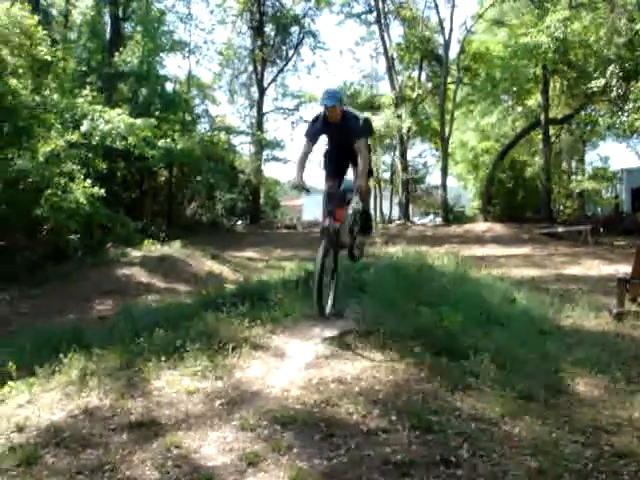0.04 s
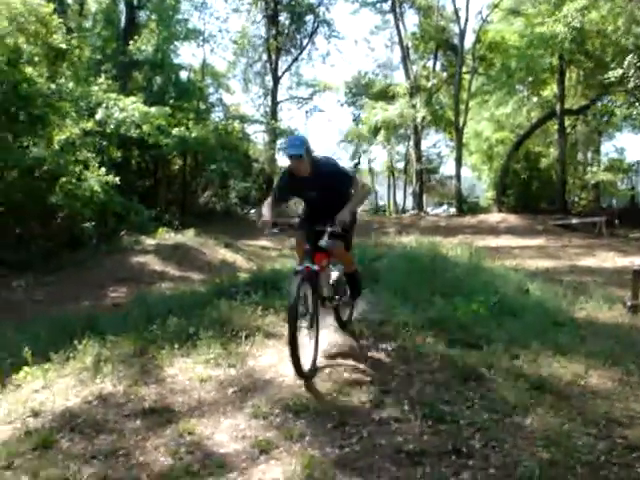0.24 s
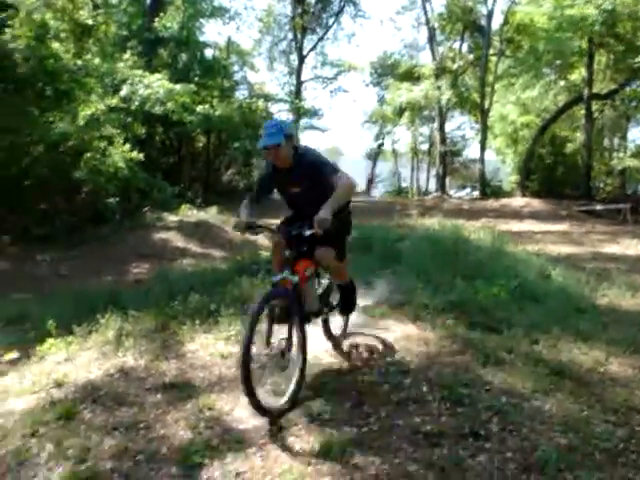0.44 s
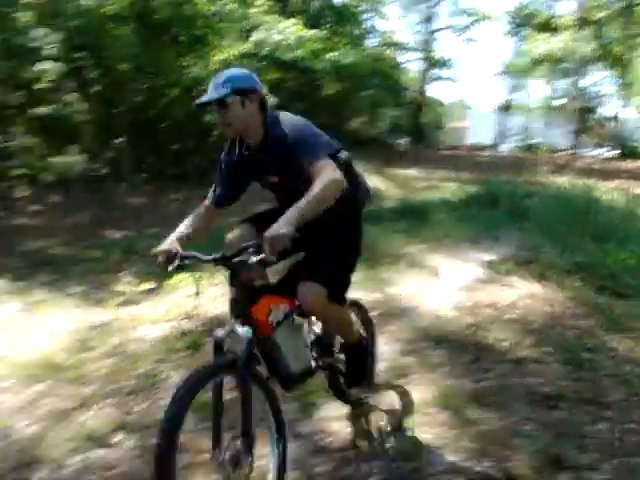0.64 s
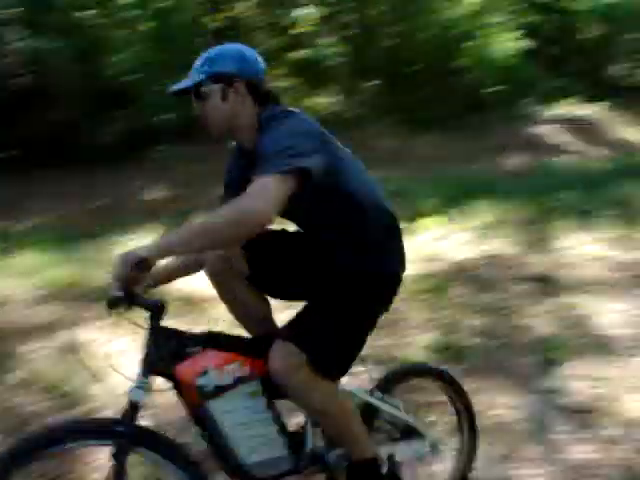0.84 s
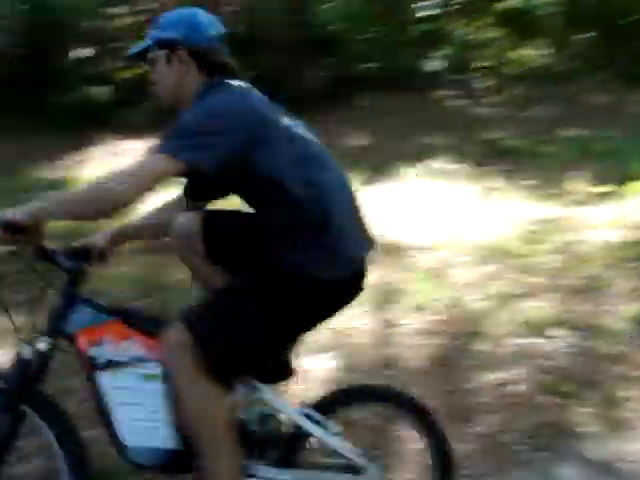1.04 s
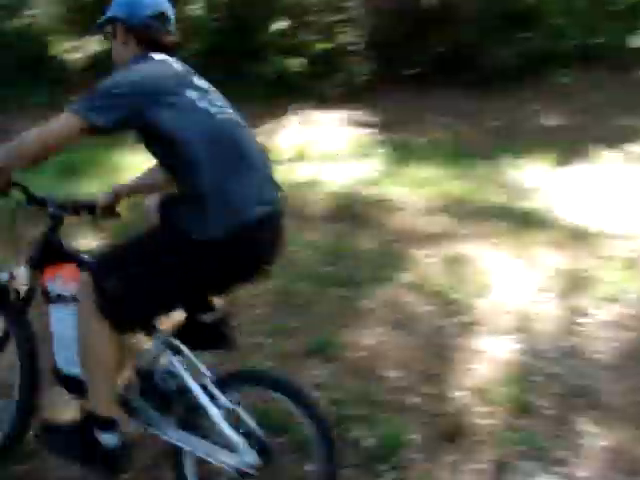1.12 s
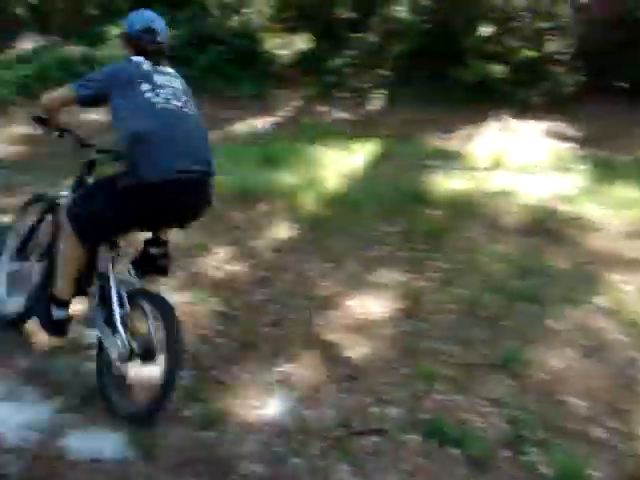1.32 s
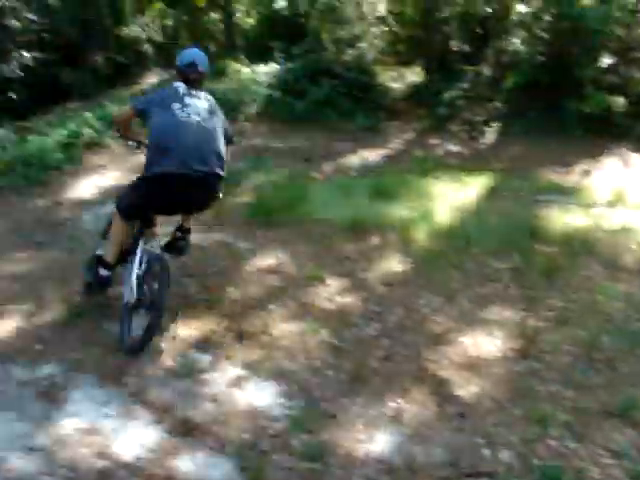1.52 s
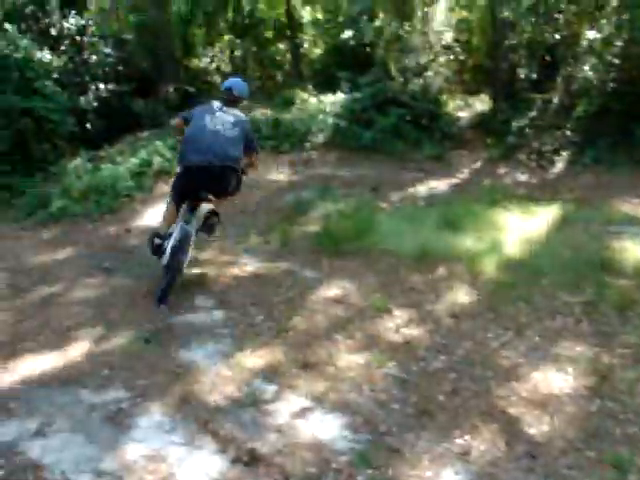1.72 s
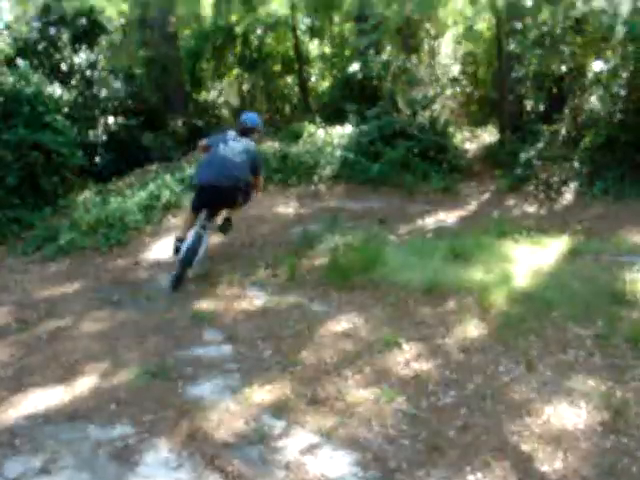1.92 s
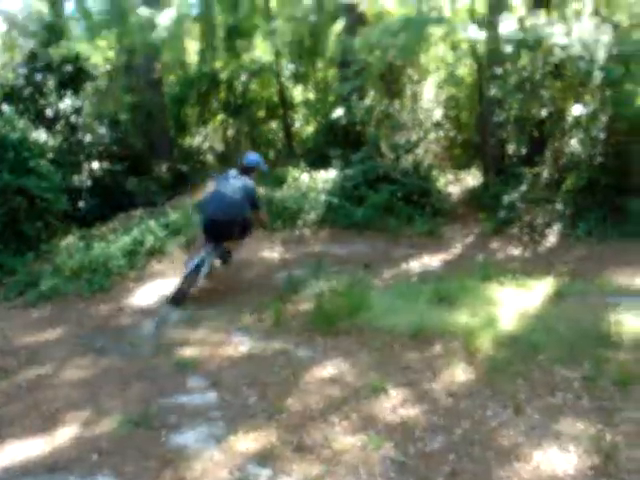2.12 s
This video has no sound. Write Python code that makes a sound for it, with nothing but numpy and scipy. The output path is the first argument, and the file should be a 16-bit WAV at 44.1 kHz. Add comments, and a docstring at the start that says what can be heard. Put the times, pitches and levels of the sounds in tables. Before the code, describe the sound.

In quiet woodland, a bike slams down from a jump near the microphone, its metal ringing and its brake squeaking briefly. The tyres crunch over leaves and grit with hollow rattling knocks, then fade. A bird chirps softly.

```python
"""Mountain bike landing on a woodland trail

Close by, a bike lands from a jump, front wheel then rear, and rolls past over dry leaves and dirt.
Bursts of contacts excite ringing metal and a hollow box on the frame; filtered grains make the tyres crunch.
Narrow noise squeaks at the brake disc. A bird repeats its phrase of gliding tones in the trees, over a soft
noise bed, while the bike fades away. The microphone overloads on the landing and has no top octave."""
import sys
import numpy as np
from scipy import signal
from scipy.fft import rfft, irfft
from scipy.io import wavfile

SR = 44100
rng = np.random.default_rng(int(sys.argv[2]) if len(sys.argv) > 2 else 0)


def persist_wave(psi):
    """Save psi, clipped to +-1, as 16-bit WAV."""
    counts = np.round(np.clip(psi, -1, 1) * 32767).astype(np.int16)
    wavfile.write(sys.argv[1], SR, np.atleast_2d(counts).T)


N = 94815
TIME_S = np.arange(N) / SR

# rear wheel landing, blows and their after-rattle: start_s, length_s, level_db
LANDING_BLOWS = [(0.2971, 0.005, -3), (0.3098, 0.0065, -7), (0.324, 0.0079, -9.5), (0.337, 0.0016, -23.5),
                 (0.365, 0.014, -26.5)]
LAND_RELEASE_S = 0.0044
LAND_RING_DB, LAND_BODY_DB, LAND_SPRAY_DB = 18, -10, -11.5
# one-sided lurch of the overloaded microphone
LURCH_START_S, LURCH_LENGTH_S, LURCH_DB = 0.298, 0.039, -18

# knocks over bumps: start_s, length_s, box_level_db, clack_level_db
BUMP_KNOCKS = [(0.22, 0.0089, -23, -28), (.229, 0.018, -24.5, -23.5), (0.282, 0.015, -30, -23.5),
               (0.412, 0.017, -26.5, -30.5), (0.462, 0.015, -23.5, -29.5), (0.5, 0.013, -24.5, -28),
               (0.639, 0.03, -35.5, -30.5), (0.689, 0.0058, -31, -17.5), (.699, 0.0072, -18.5, -19),
               (0.723, 0.013, -32, -28), (0.7881, .007, -15.5, -19), (0.798, 0.0048, -17, -27),
               (0.812, 0.021, -26.5, -27), (0.856, 0.0068, -23.5, -24.5), (0.882, 0.0067, -21.5, -26),
               (0.89, 0.0057, -22.5, -22.5), (0.923, 0.018, -27, -36), (0.976, 0.0044, -25.5, -37),
               (1.033, .008, -31, -25), (1.087, 0.019, -25.5, -28), (1.119, 0.0066, -19.5, -27.5),
               (1.161, 0.0069, -24, -27.5), (1.174, 0.013, -25, -27), (1.2028, 0.0088, -12.5, -19),
               (1.2132, 0.0034, -19.5, -27), (1.2675, 0.0032, -19, -20), (1.2743, 0.0035, -13.5, -26),
               (1.309, 0.012, -26, -29), (1.337, 0.015, -24, -26), (1.4972, 0.011, -28.5, -28.5),
               (1.642, 0.0055, -30, -33), (1.701, 0.0034, -48, -38.5), (1.756, 0.0019, -51, -33.5),
               (1.846, 0.0036, -30.5, -33), (1.87, 0.0085, -26, -30.5), (1.892, .008, -33, -34.5),
               (2.13, 0.017, -34.5, -45)]
KNOCK_RATE_HZ, KNOCK_RING_DB = 900, -13.5
BOX_RELEASE_S, CLACK_RELEASE_S = 0.00324, 0.0018
BOX_LOW_HZ, CLACK_LOW_HZ = 173, 270
# hollow box resonances: pitch_hz, width_hz, level_db
BOX_MODES = [(238, 200, -24.5), (327, 72, -2), (455, 133, 2.5), (529, 78, -1.5), (787, 350, -8.5),
             (1211, 97, -8)]
# ringing metal of frame and wheels: pitch_hz, t60_s, level_db
FRAME_MODES = [(320.4, 0.11, 0.5), (476, 0.087, 2), (871, 0.27, -6.5), (964, 0.32, -8.5),
               (1061.5, 0.25, -3.5), (1836, 0.45, -0.5), (2060, 0.053, 2), (2050, 0.22, -8),
               (2630, 0.18, -21), (2750, 0.2, -7), (3050, 0.18, -4.5), (3360, .12, -7), (3770, .18, -24),
               (4430, .14, -12)]
# outline of hard contacts on the frame: frequency_hz, level_db
CLACK_COLOUR = [(150, -22.5), (400, -0.5), (750, 4.5), (1200, -2.5), (1550, -6.5), (2000, -1.5), (2800, -2),
                (3700, -5), (4400, -5.5), (6000, -12), (8500, -15), (10000, -22)]

# rolling tyres over time: time_s, rumble_db, crunch_db, crackle_db
TYRE_LEVELS = [(0, -45.5, -44.5, -51), (.2, -43, -41.5, -52), (0.271, -28.5, -32, -40),
               (0.343, -30.5, -22.5, -26.5), (0.421, -29.5, -25.5, -34.5), (.52, -39, -31, -35),
               (.6, -36.5, -34, -42), (0.699, -31, -32, -57), (.86, -32.5, -31, -36),
               (.97, -31.5, -30, -36.5), (1.099, -33.5, -28.5, -35.5), (1.22, -30, -29.5, -33.5),
               (1.35, -35.5, -29.5, -35.5), (1.46, -31.5, -36, -39.5), (1.54, -40, -33.5, -44),
               (1.58, -39, -38.5, -40.5), (1.8, -39, -39.5, -50.5), (1.96, -38, -43, -46.5),
               (2.06, -38.5, -40, -49), (2.15, -37.5, -35.5, -46.5)]
# outline of tyre rumble and the low body of the landing: frequency_hz, level_db
RUMBLE_COLOUR = [(25, -24), (60, -12), (130, -11.5), (220, -0.5), (330, -0.5), (480, 1.5), (700, -6.5),
                 (1100, -11), (1800, -30), (5000, -59.5)]
# outline of crunching grit: frequency_hz, level_db
CRUNCH_COLOUR = [(300, -18.5), (700, -0.5), (1150, 1.5), (1550, -1.5), (2000, -2), (2900, 0.5),
                 (3800, -7.5), (4800, -11.5), (6500, -7), (10000, -31)]
# outline of dry leaves and twigs: frequency_hz, level_db
LEAF_COLOUR = [(1000, -9.5), (3000, -15), (4700, 3), (6200, -1.5), (7600, 2), (8600, 3.5), (9300, 0.5),
               (10000, -4)]
GRAIN_FLICKER_DB = 1

# leaves and twigs snapping: start_s, length_s, level_db
LEAF_SNAPS = [(0.215, 0.0081, -28), (0.225, .01, -30), (0.617, 0.011, -27), (0.751, 0.011, -33),
              (0.827, 0.015, -27), (1.124, 0.0026, -24.5), (1.253, 0.0035, -31), (1.593, 0.0019, -41),
              (1.7, 0.0041, -32), (1.75, 0.0019, -32.5), (1.774, 0.0024, -30), (1.803, 0.0077, -35),
              (1.85, 0.0096, -26.5), (1.881, 0.0045, -31), (1.996, 0.0052, -38)]
SNAP_RELEASE_S = 0.002

# sideways tyre scuffs in the turn: middle_s, half_length_s, level_db
TURN_SCUFFS = [(1.345, 0.059, -32), (1.427, 0.043, -38.5), (1.55, 0.021, -46), (2.124, 0.055, -42.5)]
# scuff resonances: pitch_hz, width_hz, level_db
SCUFF_MODES = [(1980, 320, -2), (2520, 250, -0.5), (3050, 420, -2)]

# brake disc squeaks: start_s, length_s, level_db
BRAKE_SQUEAKS = [(.03, .05, -55), (0.157, 0.056, -43), (.372, 0.028, -22.5), (0.4, 0.064, -38)]
SQUEAK_HZ, SQUEAK_FILTER_WIDTH_HZ = 8760, 260

# bird phrase starts: start_s, level_db
BIRD_PHRASES = [(0, -36), (0.536, -32.5), (.805, -34)]
# notes within a phrase: start_s, length_s, start_hz, end_hz, level_db
BIRD_NOTES = [(0, 0.014, 3560, 3400, 0), (0, 0.046, 2897, 2980, 1.5), (0.051, 0.048, 4220, 4200, -2),
              (0.09, 0.027, 4345, 4970, 4.5), (.1, 0.057, 4400, 4700, -6), (0.117, 0.051, 4970, 5000, -4),
              (0.145, 0.022, 2480, 2590, -1), (0.179, 0.033, 3620, 3430, 3.5)]
WARBLE_SHARE = 0.026  # spread of the pitch wander, as a share of the pitch

TREES_T60_S, TREES_BUILDUP_S = 0.45, 0.0088
BIRD_ECHO_DB, BIKE_ECHO_DB = -1.5, -19.5
# outline of the woodland background: frequency_hz, level_db
WOODS_COLOUR = [(25, -35), (60, 2.5), (150, -7.5), (310, 11), (700, -4), (1400, -8), (2800, -10),
                (4000, -27.5), (6500, -39), (10000, -17)]
WOODS_DB = -47

# microphone levels are on a scale where full scale is 1
OVERLOAD_LEVEL, CEILING = 0.69, 0.75
MIC_TOP_HZ, FINAL_TOP_HZ = 9850, 15400


def landing():
    """The rear wheel slams down: chain and frame clatter, the first blow rings the metal, leaves spray."""
    contacts = grains(rate=4500, spread_db=2)
    force = sum(undb(db) * burst(contacts, gate(start, length, LAND_RELEASE_S))
                for start, length, db in LANDING_BLOWS)
    clatter = colour(force, CLACK_COLOUR)
    body = undb(LAND_BODY_DB) * colour(force, RUMBLE_COLOUR)
    spray = undb(LAND_SPRAY_DB) * colour(force, LEAF_COLOUR)
    # only the first blow sets this ring going
    first_blow = signal.unit_impulse(N, int(LANDING_BLOWS[0][0] * SR))
    metal = undb(LAND_RING_DB) * frame(first_blow)
    return clatter + metal + body + spray


def overload_lurch():
    """The overloaded microphone's level lurches to one side and recovers."""
    offset = half_sine(LURCH_START_S, LURCH_LENGTH_S) ** 0.55
    return undb(LURCH_DB) * highpass(offset, 7, order=1)


def knocks():
    """Each bump is a brief rattle of contacts that booms in the box and clacks on the frame."""
    contacts = grains(rate=KNOCK_RATE_HZ, spread_db=2) + 1.31 * rng.standard_normal(N)
    boom = ring(contacts, BOX_MODES)
    hard = colour(contacts, CLACK_COLOUR)
    box, clack = np.zeros(N), np.zeros(N)
    for start, length, box_db, clack_db in BUMP_KNOCKS:
        box += undb(box_db) * burst(boom, gate(start, length, BOX_RELEASE_S))
        # the clack is hardest at first
        attack = 0.3 * gate(start, 0, release=0.0012)
        clack += undb(clack_db) * burst(hard, gate(start, length, CLACK_RELEASE_S) + attack)
    metal = undb(KNOCK_RING_DB) * frame(clack)
    return highpass(box, BOX_LOW_HZ) + highpass(clack, CLACK_LOW_HZ) + metal


def frame(x):
    """Metal of frame and wheels rings as damped modes, each with its own decay time."""
    # a mode's width follows from its 60 dB decay time
    return ring(x, [(hz, np.log(1000) / (np.pi * t60), db) for hz, t60, db in FRAME_MODES])


def tyres():
    """Knobs drum on the dirt, grit crunches and dry leaves crackle, in uneven patches."""
    time_s, *curves = np.array(TYRE_LEVELS).T
    patches_db = 1.05 * walk(60)
    rumble_gain, crunch_gain, crackle_gain = (
        undb(np.interp(TIME_S, time_s, curve) + patches_db) for curve in curves)
    drumming = colour(grains(rate=1800, spread_db=1.5), RUMBLE_COLOUR)
    grit = debris(rate=4500, spread_db=2.5, low_hz=610, high_hz=5210)
    crunch = unit(colour(grit, CRUNCH_COLOUR))
    crackle_flicker = undb(3.6 * walk(160))
    leaves = debris(rate=6000, spread_db=6, low_hz=2960, high_hz=9700, count=6)
    crackle = crackle_flicker * unit(colour(leaves, LEAF_COLOUR))
    return rumble_gain * drumming + crunch_gain * crunch + crackle_gain * crackle


def debris(rate, spread_db, low_hz, high_hz, count=9):
    """Grains crack in neighbouring pitch bands, each band flickering on its own; rms 1."""
    centres = np.linspace(low_hz, high_hz, count)
    width = centres[1] - centres[0]
    bands = (undb(GRAIN_FLICKER_DB * walk(110)) * ring(grains(rate / count, spread_db), [(hz, width, 0)])
             for hz in centres)
    return unit(sum(bands))


def snaps():
    """Single leaves and twigs break under the tread as short bursts of grains."""
    cracks = grains(rate=1500, spread_db=-1.5)
    breaks = sum(undb(db) * burst(cracks, gate(start, length, SNAP_RELEASE_S))
                 for start, length, db in LEAF_SNAPS)
    return colour(breaks, LEAF_COLOUR)


def scuffs():
    """Grit rasps under the tread as the bike leans into the turn."""
    swell = sum(undb(db) * np.exp(-((TIME_S - middle) / half) ** 2) for middle, half, db in TURN_SCUFFS)
    rasp = ring(grains(rate=1300, spread_db=0), SCUFF_MODES)
    return swell * unit(highpass(rasp, 1500))


def brake():
    """The disc grazes its pad and sings one high, rough note that swells and fades."""
    mode = [(SQUEAK_HZ, SQUEAK_FILTER_WIDTH_HZ, 0)]
    note = ring(ring(rng.standard_normal(N), mode), mode)  # two passes narrow the note
    return sum(undb(db) * burst(note, np.sqrt(half_sine(start, length)))
               for start, length, db in BRAKE_SQUEAKS)


def bird():
    """Gliding whistles with a random warble form a phrase, repeated and blurred by the trees."""
    song = np.zeros(N)
    for phrase_start, phrase_db in BIRD_PHRASES:
        for start, length, from_hz, to_hz, db in BIRD_NOTES:
            onset = phrase_start + start
            glide_hz = from_hz + (to_hz - from_hz) * progress(onset, length)
            pitch_hz = glide_hz * (1 + WARBLE_SHARE * walk(900))
            whistle = np.sin(2 * np.pi * np.cumsum(pitch_hz) / SR)
            song += undb(phrase_db + db) * np.sqrt(half_sine(onset, length)) * whistle
    return song + undb(BIRD_ECHO_DB) * outdoors(song)


def outdoors(x):
    """Scattered echo from the trunks: a noise tail that builds up quickly and decays."""
    decay = undb(-60 * TIME_S / TREES_T60_S)
    buildup = 1 - np.exp(-TIME_S / TREES_BUILDUP_S)
    return through(x, rng.standard_normal(N) * decay * buildup)


def woods():
    """Soft background of coloured noise whose level slowly wanders."""
    level_db = WOODS_DB + 0.59 * walk(6.6)
    return undb(level_db) * colour(rng.standard_normal(N), WOODS_COLOUR)


def undb(db):
    """Decibels to an amplitude factor."""
    return 10 ** (np.asarray(db) / 20)


def unit(x):
    """Scale to rms 1."""
    return x / np.sqrt(np.mean(x ** 2) + 1e-20)


def grains(rate, spread_db):
    """Clicks at random moments, of random size and sign, averaging rate per second; rms 1."""
    size = undb(spread_db * np.clip(rng.standard_normal(N), -2, 2))
    hits = rng.random(N) < rate / SR
    return unit(hits * size * np.sign(rng.standard_normal(N)))


def walk(rate):
    """Random wander, spread near 1, in straight lines between rate fresh values per second."""
    knots = rng.standard_normal(N // 10)
    return np.interp(TIME_S * rate, np.arange(len(knots)), knots)


def progress(start, length):
    """Ramp from 0 to 1 over an event, held outside it."""
    return np.clip((TIME_S - start) / length, 0, 1)


def half_sine(start, length):
    """Half a sine arch over an event, zero outside it."""
    return np.abs(np.sin(np.pi * progress(start, length)))


def gate(start, length, release):
    """Sudden start, hold, exponential release."""
    since = TIME_S - start
    return (since >= 0) * np.exp(-np.maximum(since - length, 0) / release)


def burst(x, envelope):
    """A stretch of x under the envelope, at rms 1 where the envelope is 1."""
    return unit(x * envelope) * np.sqrt(np.mean(envelope ** 2))


def through(x, response):
    """Filter by an impulse response scaled to unit energy."""
    return signal.fftconvolve(x, response / np.sqrt(np.sum(response ** 2)))[:N]


def ring(x, modes):
    """Excite damped sines given as pitch_hz, width_hz, level_db; a wider mode dies sooner."""
    t = np.arange(SR // 2) / SR
    response = np.zeros(len(t))
    for k, (hz, width, db) in enumerate(modes):
        gain = (-1) ** k * undb(db) * np.sqrt(width)  # neighbouring modes alternate in sign
        response += gain * np.exp(-np.pi * width * t) * np.sin(2 * np.pi * hz * t)
    return through(x, response)


def colour(x, points):
    """Minimum-phase filter with the outline given as frequency_hz, level_db."""
    hz, db = np.array(points).T
    grid = np.fft.rfftfreq(4096, 1 / SR) + 1  # 1 Hz offset avoids log of zero
    outline_db = np.interp(np.log(grid), np.log(hz), db)
    cepstrum = irfft(np.log(undb(outline_db)))
    # folding the cepstrum forward in time makes the filter causal
    cepstrum[1:len(grid) - 1] *= 2
    cepstrum[len(grid):] = 0
    return through(x, irfft(np.exp(rfft(cepstrum))))


def highpass(x, hz, order=3):
    """Remove what lies below hz."""
    return signal.sosfilt(signal.butter(order, hz, "high", fs=SR, output="sos"), x)


def lowpass(x, hz):
    """Steeply remove what lies above hz."""
    return signal.sosfilt(signal.ellip(10, 0.2, 80, hz, fs=SR, output="sos"), x)


def scene():
    """Bike close by with its echo from the trees, the bird and the woods, in one channel."""
    bike = tyres() + knocks() + landing() + overload_lurch() + snaps() + scuffs() + brake()
    background = woods()
    echo = undb(BIKE_ECHO_DB) * outdoors(bike)
    return (bike + echo + bird() + background)[None]


def record(dry):
    """The microphone squashes loud peaks, has no top octave, and clips what still overshoots."""
    squashed = dry / (1 + (dry / OVERLOAD_LEVEL) ** 4) ** (1 / 4)
    clipped = np.clip(lowpass(squashed, MIC_TOP_HZ), -CEILING, CEILING)
    return lowpass(clipped, FINAL_TOP_HZ)


dry = scene()
out = record(dry)
persist_wave(out)
```